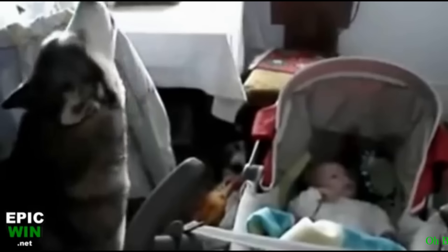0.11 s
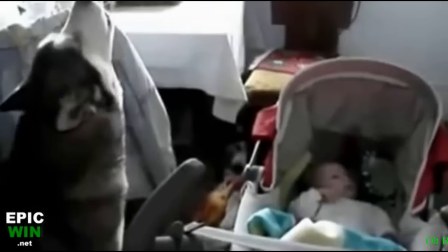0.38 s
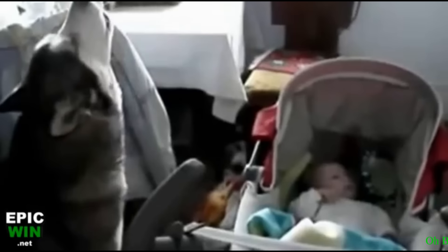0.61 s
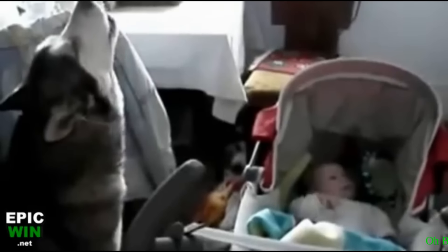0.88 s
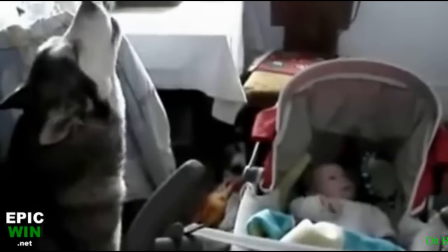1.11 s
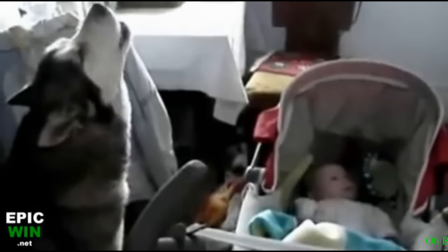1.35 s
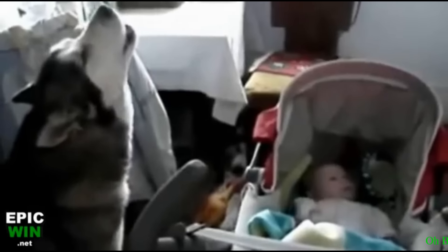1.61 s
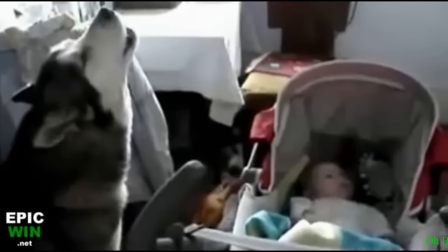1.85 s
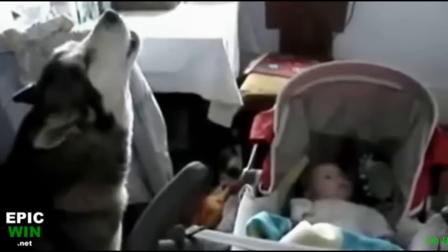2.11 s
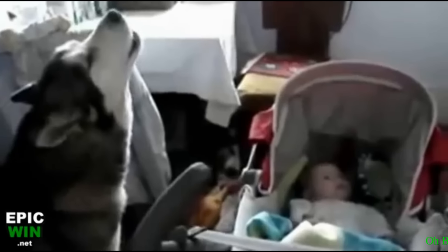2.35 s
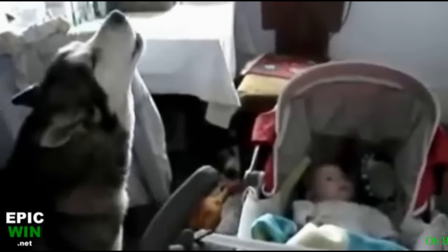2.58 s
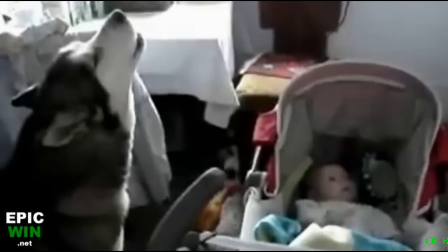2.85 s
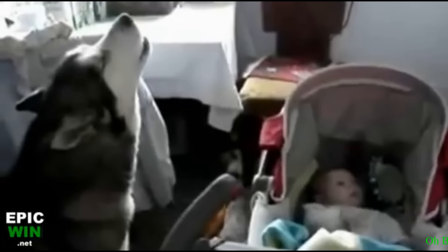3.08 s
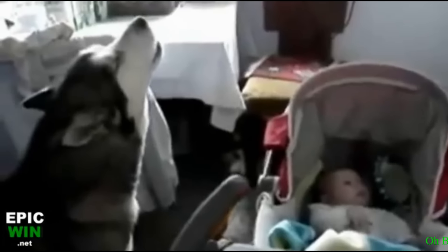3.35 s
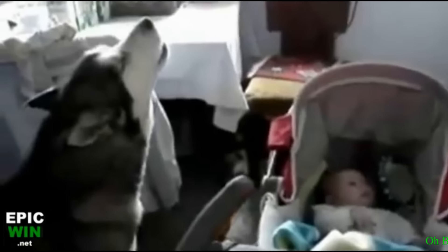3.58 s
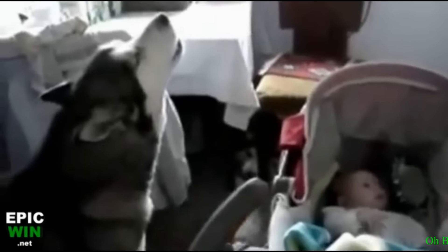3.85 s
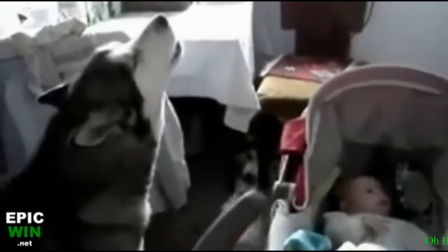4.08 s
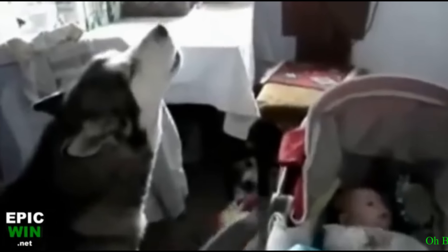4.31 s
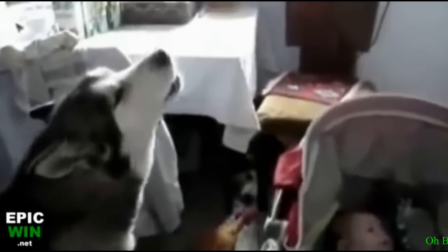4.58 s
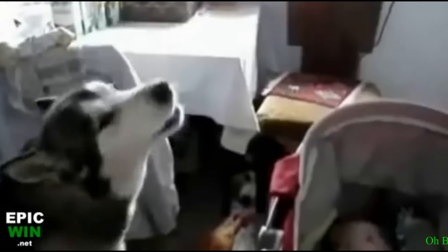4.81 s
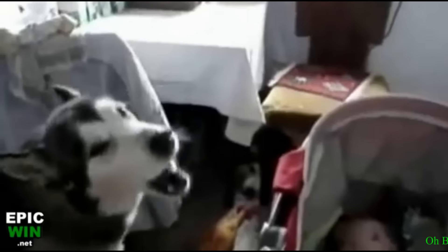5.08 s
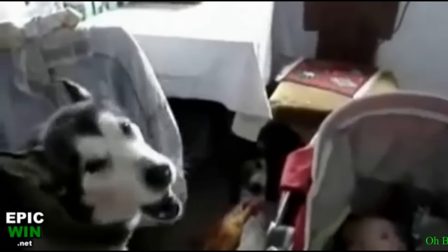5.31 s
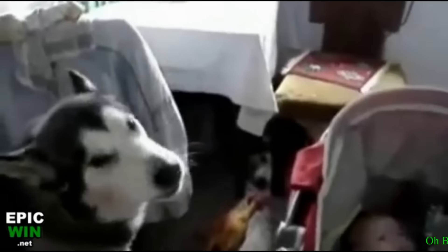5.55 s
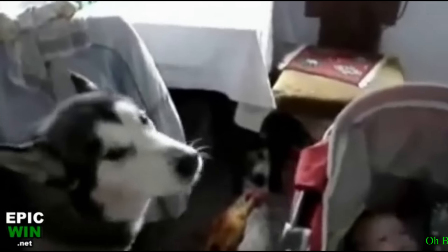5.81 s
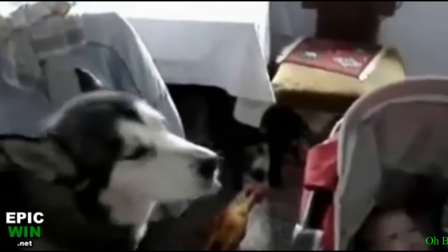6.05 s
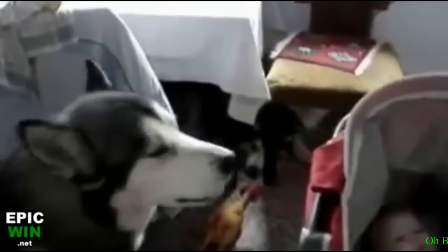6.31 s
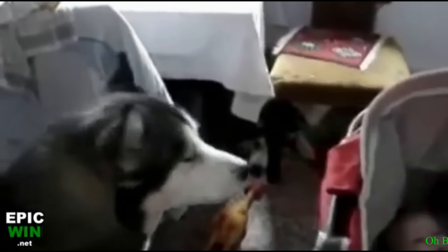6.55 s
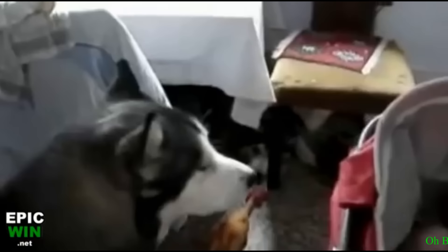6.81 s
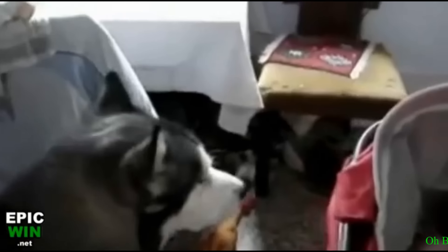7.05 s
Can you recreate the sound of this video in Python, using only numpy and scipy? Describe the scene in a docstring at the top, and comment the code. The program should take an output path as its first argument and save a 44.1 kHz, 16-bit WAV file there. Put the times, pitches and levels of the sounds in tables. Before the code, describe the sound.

Close in a small furnished room, a big dog is already howling: a loud, smooth note climbs in steps, holds, slides lower with brief hoarse breaks, and wavers on until about five seconds. A short room echo trails off. Then much quieter open-mouthed puffs, a small wet lip smack, a dull bump and a last soft breath. Faint mains buzz and hiss lie underneath; the sound is nearly mono and slightly dull on top.

```python
"""One long howl steps up, slides down and dies away; then puffs, gliding breath, lip smacks and dull bumps.
A large dog in a small furnished room: the voice is a stack of sine partials, notched by standing waves.
Puffs are noise through mouth resonances, some gliding as the jaws open; smacks and bumps are ringing modes.
Mains buzz and hiss run throughout; the sound is nearly mono and faint bands drop out under loud sound."""
import sys
import numpy as np
from scipy import signal
from scipy.fft import rfft, irfft, next_fast_len
from scipy.io import wavfile
from scipy.ndimage import uniform_filter1d

SR = 44100
rng = np.random.default_rng(int(sys.argv[2]) if len(sys.argv) > 2 else 0)


def volts_from_decibels(level):
    """Turn decibel levels (scalar or array-like) into linear amplitude factors."""
    exponent = np.asarray(level, float) / 20
    return 10 ** exponent


def int16_out(signal):
    """Quantize to a 16-bit WAV file."""
    q = np.round(np.clip(np.atleast_2d(signal).T, -1, 1) * 32767)
    wavfile.write(sys.argv[1], SR, q.astype(np.int16))


N = 316151

# Pitch of the note. Each row: time in seconds, pitch in Hz.
PITCH_HZ = [(0.0, 323.3), (0.054, 379.2), (0.15, 402), (0.27, 407.9), (0.46, 402.4), (0.5, 409.9),
            (0.66, 417.5), (0.69, 426.0), (0.71, 447.3), (0.76, 463.6), (1.2, 476.3), (1.28, 480.5),
            (1.36, 488.5), (1.43, 495.9), (1.56, 482.8), (1.83, 473.3), (1.9, 460.6), (2.08, 460.7),
            (2.105, 447.7), (2.13, 422.2), (2.24, 407), (2.31, 371), (2.41, 353.8), (2.47, 363.5),
            (2.62, 360.8), (2.75, 358.7), (2.93, 369.7), (3.2, 350), (3.5, 353.6), (3.66, 364.4),
            (3.73, 372.5), (3.84, 358), (3.97, 341.7), (4.08, 344.5), (4.33, 344.5), (4.43, 344.3),
            (4.52, 335.4), (4.72, 331.7), (4.79, 325), (4.9, 313.7), (5.0, 308)]
# Effort and mouth opening. Each row: time in seconds, 1st partial in dB, 2nd partial over the 1st in dB,
# brightness (base level of the high partials) in dB.
HOWL_DB = [(0.0, -12.5, -3.5, -56), (0.07, -4, -19.5, -59.5), (0.16, -12.0, 2, -54), (0.4, -15.5, 6, -55),
           (0.66, -10.5, 1.5, -53), (0.76, -6.5, -7.5, -57.5), (1.0, -10.5, -10, -52.5),
           (1.4, -8, -13, -52), (1.7, -8.5, -11, -51.5), (2.0, -15, 1.5, -53), (2.22, -13.5, 1.5, -57.5),
           (2.3, -6.5, -17.5, -54.5), (2.6, -9, -15.5, -60.5), (3.0, -7.5, -19, -61),
           (3.4, -11, -16.5, -67), (3.75, -7.5, -16, -58.5), (4.0, -8, -14, -66), (4.3, -11, -12.5, -63),
           (4.6, -8, -16.0, -63.5), (4.8, -10.5, -13.5, -61.5), (4.88, -21.5, -1, -86),
           (4.95, -29.5, -7.5, -81), (5.02, -61, 14, -87)]
# Moving resonances that lift partials 3 to 7. Each row: time in seconds, mouth in Hz, mouth level in dB,
# nose in Hz, nose level in dB.
FORMANTS = [(0, 1400, -48.5, 2200, -45.5), (.12, 1600, -38.5, 2310, -45), (.3, 1675, -42.5, 2345, -37.5),
            (.58, 1630, -44.5, 2300, -43), (.71, 1700, -35.5, 2200, -44.5), (.78, 1400, -45.5, 2320, -46),
            (1.1, 1420, -46, 2314, -44.5), (1.4, 1464, -40, 2790, -53), (1.6, 1420, -51, 2620, -45.5),
            (1.85, 1424, -40.5, 2350, -45), (2.1, 1500, -38, 2240, -34.5), (2.3, 1150, -42.5, 2196, -48),
            (2.7, 1080, -45.5, 2296, -51.5), (3.1, 1075, -53.5, 2164, -57), (3.35, 1080, -49, 2077, -65.5),
            (3.7, 1100, -50.5, 2136, -54), (4.1, 1036, -48.5, 2356, -74.5), (4.4, 1045, -48.5, 2344, -69.5),
            (4.6, 1002, -40.5, 2330, -55.5), (4.85, 970, -44.5, 2250, -55), (5, 937, -65, 2200, -88)]
# Throat and mouth resonances of partials 8 to 25. Each row: centre in Hz, width in Hz,
# level over the brightness in dB.
THROAT = [(2720, 480, -7), (3540, 750, -15), (4736, 580, -9), (5502, 120, -7.5), (6327, 470, -11.5),
          (7500, 2300, -19)]
# Standing-wave notches, one list for the 1st partial, one for the 2nd. Each row: time in seconds,
# depth in dB, spread of the bell (standard deviation) in seconds.
DIPS = [
    [(0.021, 5, 0.0057), (0.09, 6, 0.021), (0.14, 8.5, 0.0046), (0.245, 25.5, 0.013), (0.532, 15.5, 0.03),
     (0.614, 8.5, 0.031), (0.738, 19.5, 0.036), (0.747, 0.5, 0.005), (0.835, 8, 0.013), (0.918, 7, 0.023),
     (1.07, 0.5, 0.043), (1.37, 6, 0.02), (1.514, 3.0, 0.024), (1.911, 7.5, 0.03), (1.996, 11, 0.0069),
     (2.065, 1.5, 0.02), (2.137, 6.5, 0.007), (2.171, 10, 0.0062), (2.248, 16, 0.019), (2.291, 13, 0.0062),
     (2.35, 4, 0.012), (2.399, 17, 0.025), (2.455, 24.5, 0.016), (2.635, 3.5, 0.016), (2.758, 20, 0.034),
     (2.9, 2.5, 0.019), (3.03, 3, 0.031), (3.107, 20.5, 0.024), (3.26, 4.5, 0.023), (3.412, 4.5, 0.029),
     (3.597, 8.5, 0.028), (3.838, 16.5, 0.034), (3.949, 15.5, 0.012), (3.99, 8, 0.027), (4.102, 8, 0.025),
     (4.327, 8.5, 0.041), (4.492, 8.5, 0.017), (4.711, 13.5, 0.073), (4.916, 6.0, 0.01)],
    [(0.044, 8, 0.005), (0.085, 4.5, 0.007), (0.125, 14.5, 0.013), (0.22, 2, 0.024), (0.38, 0.5, 0.02),
     (0.586, 5, 0.031), (0.737, 12, 0.06), (0.963, 24, 0.011), (1.069, 9.5, 0.02), (1.29, 11.0, 0.038),
     (1.342, 10, 0.006), (1.422, 5, 0.013), (1.536, 9.0, 0.011), (1.632, 11.5, 0.097), (1.872, 2.5, 0.012),
     (1.93, 5, 0.016), (2.032, 10.5, 0.013), (2.1, 6.5, 0.0078), (2.16, 1.5, 0.019), (2.248, 14.5, 0.0085),
     (2.295, 8, 0.009), (2.384, 12.5, 0.017), (2.54, 6, 0.032), (2.672, 21.5, 0.032), (2.82, 6.5, 0.0058),
     (2.912, 6.5, 0.028), (3.082, 25.5, 0.026), (3.194, 9, 0.015), (3.368, 19.5, 0.012), (3.539, 17, 0.031),
     (3.64, 15.5, 0.01), (3.74, 20.5, 0.022), (3.813, 25.5, 0.019), (3.857, 20, 0.007),
     (3.905, 9.5, 0.0056), (3.95, 4, 0.012), (4.02, 3.5, 0.021), (4.27, 2.5, 0.03), (4.546, 3.5, 0.036),
     (4.843, 30.5, 0.064), (4.9, 31, 0.011)],
]
# Moments of extra hoarseness. Each row: start in seconds, length in seconds,
# added hoarseness 0 to 1 (0 adds none).
HOARSE_MOMENTS = [(-.05, .1, .45), (.11, .06, .25), (0.672, .11, .35), (2.088, .07, .35), (2.199, .16, 0.3),
                  (3.797, 0.11, 0), (4.28, .08, 0), (4.39, .07, 0.1), (4.501, .05, 0), (4.739, 0.12, 0.1)]
# Noise bursts: a very short one at the start, then stronger breath noise. Each row: start in seconds,
# length in seconds, extra level in dB.
NOISE_BURSTS = [(-.05, 0.034, 66), (.68, .28, 5), (1.739, .5, 8)]
# Buzz lines. Each row: frequency in Hz, level in dB.
HUM = [(30, -69.5), (60, -65), (200, -63.5), (300, -63), (900, -71.5), (950, -77.5), (1000, -66.5),
       (1050, -68.5), (1100, -71), (1150, -78.5), (1200, -77.5), (1250, -74.5), (1300, -68.5), (1500, -73),
       (1600, -80.5), (1650, -74.5), (1700, -73), (1800, -73.5), (2000, -75.5)]
# Hiss colour. Each row: frequency in Hz, relative density in dB.
HISS_COLOUR = [(12, -34), (20, 9), (49, -4), (115, -3.5), (193, -6), (301, -2), (659, -5), (1080, -11),
               (1400, -10.5), (1520, -8), (2430, -15), (7460, -18.5), (10200, -23), (13300, -55),
               (22000, -120)]
# Loop delays of the room in seconds, in a single row.
ECHO_S = [
    [.0131, .0173, .0199, .0237, .0281, .0323, .0371, .0419],
]
# Breath puffs. Each row: start in seconds, length in seconds, level in dB, strongest frequency in Hz,
# loss away from it in dB per octave.
PUFFS = [(5.09, 0.23, -47, 810, 8), (5.413, 0.16, -58, 1114, 4.5), (5.535, 0.049, -49, 4500, 9),
         (5.566, 0.31, -52.5, 1240, 5.5), (6.237, .43, -56, 3000, 6), (6.74, .16, -55.5, 1330, 4.5),
         (7.024, .2, -60.5, 1810, 4.5)]
# Panting-mouth resonances in four groups, low to high. Each row: centre in Hz, width of one pass in Hz,
# relative level in dB.
MOUTH = [
    [(477, 230, 1), (636, 87, 1.5)],
    [(841, 100, 17), (1020, 140, 9.5), (1248, 130, 16), (1438, 130, 14)],
    [(2150, 990, -2), (2420, 2000, 6), (2810, 130, 11)],
    [(4830, 2100, 18), (7900, 4000, 9)],
]
# Mouth resonances of the breath, gliding as the jaws open. Each row: start in seconds,
# length in seconds, first centre in Hz, last centre in Hz, level in dB.
GLIDES = [(5.111, .2, 625, 728, -49.5), (5.106, 0.17, 1250, 1592, -66), (5.125, .18, 1952, 2080, -54),
          (5.43, .07, 850, 867, -54), (5.536, .1, 852, 884, -52), (5.584, 0.23, 1003, 1310, -58),
          (5.602, 0.13, 1930, 1890, -58), (5.873, 0.68, 1086, 1128, -62), (6.0, 0.079, 402, 440, -54),
          (6.238, 0.33, 2380, 2610, -62)]
# Dull bumps. Each row: start in seconds, level in dB, base mode in Hz.
BUMPS = [(5.429, -48, 863), (5.991, -42, 333)]
# Wet lip smacks. Each row: start in seconds, level in dB, base mode in Hz.
SMACKS = [(5.5393, -43.5, 3700), (5.7773, -53, 3500)]
# Drop threshold of faint bands. Each row: frequency in Hz, dB below the power of the moment.
DROP_BELOW_DB = [(900, 78.5), (1300, 49), (2500, 61), (3300, 55), (5000, 57), (7000, 53), (10000, 63)]
# Right-channel tint. Each row: centre in Hz, width in Hz, gain in dB.
RIGHT = [(1900, 660, 2.02), (120, 60, 0.27), (4500, 2800, 0.66), (10500, 2000, -.7)]

STEADY_HOARSE, HOARSE_EDGE_S, HOARSE_DULL_DB = 0.07, 0.04, 17.5   # dulling: partials 3 to 7, full hoarseness
AIR_DB = -3   # over the brightness
MOUTH_WIDTH_HZ, NOSE_WIDTH_HZ = 330, 350
VALLEY_DB = -11   # floor of partials 3 to 7, over the brightness
MIDDLE_FADE_DB, SECOND_FADE_DB = 4, 1.17   # spread of random fading: partials 3 to 7, partial 2
HISS_DB = -52.5
ROOM_T60_S, ROOM_DB, WALL_CUT_HZ = 0.93, -27, 27000
SLOW_MODE_HZ, SLOW_MODE_WIDTH_HZ, SLOW_MODE_DB = 326, 1.2, -15
PUFF_RISE_S, PUFF_FALL_S = 0.036, 0.097
GLIDE_WIDTH_SHARE = 0.035   # noise low-pass rate as a share of the last centre
TOP_CUT_HZ = 10400


def rms_one(x):
    """Scale to rms 1."""
    return x / np.sqrt(np.mean(x ** 2) + 1e-20)


def in_time(rows):
    """Table columns as curves, one value a sample, corners rounded over 8 ms."""
    s, *columns = np.transpose(rows)
    t = np.arange(N) / SR
    return [uniform_filter1d(np.interp(t, s, column), size=SR // 120) for column in columns]


def wobble(rate_hz):
    """Smoothed random wobble, slow or fast by its rate: noise through a double one-pole low-pass, rms 1."""
    r = np.exp(-2 * np.pi * rate_hz / SR)
    noise = rng.standard_normal(N + SR)
    return rms_one(signal.lfilter([1], [1, -2 * r, r * r], noise)[SR:])


def span(start_s, length_s, rise_s, fall_s):
    """Gain 0 to 1 to 0 on straight ramps centred on the start and on the end."""
    t = np.arange(N) / SR
    rise = (t - start_s) / rise_s
    fall = (start_s + length_s - t) / fall_s
    return np.clip(np.minimum(rise, fall) + 0.5, 0, 1)


def fade_out(start_s, fade_s):
    """Gain 1 that falls to 0 from start_s on."""
    return np.clip((start_s + fade_s - np.arange(N) / SR) / fade_s, 0, 1)


def resonate(x, hz, width_hz):
    """One two-pole resonance, gain 1 on top."""
    r = np.exp(-np.pi * width_hz / SR)
    zeros = np.array([1, 0, -1]) * (1 - r * r) / 2
    poles = [1, -2 * r * np.cos(2 * np.pi * hz / SR), r * r]
    return signal.lfilter(zeros, poles, x)


def resonances(x, modes):
    """Parallel resonances, each applied twice for dark valleys."""
    return sum(volts_from_decibels(db) * resonate(resonate(x, hz, width_hz), hz, width_hz) for hz, width_hz, db in modes)


def peak(hz, centre_hz, width_hz):
    """Resonance curve, 1 at the centre."""
    return 1 / (1 + (2 * (hz - centre_hz) / width_hz) ** 2)


def standing_wave_dips(rows):
    """Standing waves cancel a partial: gain 1 with a bell-shaped notch per row."""
    t = np.arange(0, N, 32) / SR   # coarse steps
    notches = [1 - (1 - volts_from_decibels(-db)) * np.exp(-0.5 * ((t - s) / spread_s) ** 2) for s, db, spread_s in rows]
    return np.interp(np.arange(N) / SR, t, np.prod(notches, axis=0))


def howl():
    """Vocal folds beat steadily; hoarseness shakes size and pitch, and noise joins in."""
    hz, = in_time(PITCH_HZ)
    first_db, second_db, high_db = in_time(HOWL_DB)
    mouth_hz, mouth_db, nose_hz, nose_db = in_time(FORMANTS)
    extra = sum(h * span(s, length_s, HOARSE_EDGE_S, HOARSE_EDGE_S) for s, length_s, h in HOARSE_MOMENTS)
    hoarse = np.clip(STEADY_HOARSE + extra, 0, 1)
    jitter = 0.002 * wobble(14) + 0.025 * hoarse * wobble(90)
    phase = 2 * np.pi * np.cumsum(hz * (1 + jitter)) / SR

    first = volts_from_decibels(first_db) * standing_wave_dips(DIPS[0])
    second = volts_from_decibels(first_db + second_db + SECOND_FADE_DB * wobble(36)) * standing_wave_dips(DIPS[1])
    gains = [first, second]
    for k in range(3, 8):
        mouth = volts_from_decibels(mouth_db) * peak(k * hz, mouth_hz, MOUTH_WIDTH_HZ)
        nose = volts_from_decibels(nose_db) * peak(k * hz, nose_hz, NOSE_WIDTH_HZ)
        fading = volts_from_decibels(MIDDLE_FADE_DB * wobble(14) - HOARSE_DULL_DB * hoarse)
        gains.append((mouth + nose + volts_from_decibels(high_db + VALLEY_DB)) * fading)

    voice = 0
    for k, gain in enumerate(gains, 1):
        flutter = volts_from_decibels(0.6 * max(k - 2, 0) * wobble(60))   # room waves shake the higher partials more
        shimmer = 1 + (0.021 + 0.076 * k * hoarse) * wobble(180)
        voice = voice + gain * flutter * shimmer * np.sin(k * phase)
    for k in range(8, 26):
        lift = sum(volts_from_decibels(db) * peak(k * hz, top_hz, width_hz) for top_hz, width_hz, db in THROAT)
        voice = voice + lift * volts_from_decibels(high_db + 5.7 * wobble(9.2)) * np.sin(k * phase)   # each fades on its own

    breath = rng.standard_normal(N) * (1 + 0.25 * np.cos(phase))   # swells once a cycle
    bursts_db = sum(db * span(s, length_s, 0.1, 0.068) for s, length_s, db in NOISE_BURSTS)
    air_modes = [(3670, 1400, -15.0), (4663, 150, 6.0), (5600, 1500, -5.5), (6070, 750, -3)]
    air = volts_from_decibels(high_db + AIR_DB + bursts_db) * rms_one(resonances(breath, air_modes))
    rasp_modes = [(1520, 300, 2.5), (2230, 270, 6.5), (3700, 1500, -9)]
    rasp = volts_from_decibels(-39) * hoarse * rms_one(resonances(breath, rasp_modes))
    return (np.sqrt(2) * voice + air + rasp) * fade_out(4.99, 0.04)


def mains_buzz():
    """Sine lines of mains buzz, each wavering a little in level."""
    t = np.arange(N) / SR
    return sum(np.sqrt(2) * volts_from_decibels(db + 0.5 * wobble(3)) * np.sin(2 * np.pi * (hz * t + rng.random()))
               for hz, db in HUM)


def hiss():
    """Steady noise coloured in the spectrum."""
    hz = np.maximum(np.arange(N // 2 + 1) * SR / N, 1)
    colour_hz, colour_db = np.transpose(HISS_COLOUR)
    colour = volts_from_decibels(np.interp(np.log(hz), np.log(colour_hz), colour_db))
    return volts_from_decibels(HISS_DB) * rms_one(irfft(rfft(rng.standard_normal(N)) * colour, N))


def room(x):
    """Parallel feedback delays of alternating sign, duller on every round."""
    size = next_fast_len(N + 2 * SR)
    hz = np.arange(size // 2 + 1) * SR / size
    dull = 1 / np.sqrt(1 + (hz / WALL_CUT_HZ) ** 2)
    response = 0
    for k, delay_s in enumerate(ECHO_S[0]):
        loop = dull * volts_from_decibels(-60 * delay_s / ROOM_T60_S) * np.exp(-2j * np.pi * hz * delay_s)
        response = response + (-1) ** k * loop / (1 - loop)
    return volts_from_decibels(ROOM_DB) * irfft(rfft(x, size) * response, size)[:N]


def slow_mode(x):
    """One standing wave outlasts the rest: a very narrow resonance."""
    return volts_from_decibels(SLOW_MODE_DB) * resonate(x, SLOW_MODE_HZ, SLOW_MODE_WIDTH_HZ)


def puffs():
    """Breath through open jaws: noise in mouth resonances, each coming and going."""
    out = 0
    for modes in MOUTH:
        group_hz = np.exp(np.mean(np.log(np.array(modes)[:, 0])))
        gain = 0
        for s, length_s, db, best_hz, loss_db in PUFFS:
            group_db = db - loss_db * abs(np.log2(group_hz / best_hz))
            gain = gain + volts_from_decibels(group_db) * span(s, length_s, PUFF_RISE_S, PUFF_FALL_S)
        rush = sum(volts_from_decibels(2.0 * wobble(17)) * resonances(rng.standard_normal(N), [mode]) for mode in modes)
        out = out + gain * rms_one(rush)
    return out


def gliding_breath():
    """Mouth resonances of the breath, gliding as the jaws open: narrow noise bands."""
    out, t = 0, np.arange(N) / SR
    for s, length_s, from_hz, to_hz, db in GLIDES:
        centre_hz = np.interp(t, [s, s + length_s], [from_hz, to_hz])
        phase = 2 * np.pi * np.cumsum(centre_hz) / SR
        rate_hz = GLIDE_WIDTH_SHARE * to_hz
        band = wobble(rate_hz) * np.sin(phase) + wobble(rate_hz) * np.cos(phase)
        out = out + volts_from_decibels(db) * span(s, length_s, PUFF_RISE_S, PUFF_FALL_S) * band
    return out


def knocks(events, t60_s, overtones):
    """A click sets a few short modes ringing; overtones are (frequency ratio, dB)."""
    out, t = np.zeros(N), np.arange(SR // 5) / SR
    for s, db, hz in events:
        ring = sum(volts_from_decibels(part_db) * np.sin(2 * np.pi * hz * ratio * t) for ratio, part_db in overtones)
        at = round(s * SR)
        out[at:at + len(t)] += volts_from_decibels(db - 60 * t / t60_s) * ring
    return out


def bumps():
    """Dull bumps: two low modes ring briefly."""
    return knocks(BUMPS, 0.071, [(1, 4.5), (1.35, -5)])


def lip_smacks():
    """Wet smacks of the lips: a dense cluster of short high modes."""
    return knocks(SMACKS, 0.045, [(1, 4), (1.1, -9), (1.2, -7), (1.3, -4), (1.38, -8), (1.58, -11),
                                  (1.8, -19), (2.1, -13)])


def scene():
    """Dog, its room and the background at one microphone, sent to two channels."""
    dog = howl() + puffs() + gliding_breath() + bumps() + lip_smacks()
    heard = dog + room(dog) + slow_mode(dog) + mains_buzz() + hiss()
    return np.array([heard, heard])


def drop_faint_bands(x):
    """Frame by frame, narrow bands far under the total power of the moment drop out."""
    hz, _, frames = signal.stft(x, SR, nperseg=2048)
    power = np.abs(frames) ** 2 + 1e-16
    band = np.arange(len(hz)) // 4   # four bins a band
    band_power = np.add.reduceat(power, np.arange(0, len(hz), 4))
    band_db = 10 * np.log10(band_power)[band]
    moment_db = 10 * np.log10(uniform_filter1d(power.sum(axis=0), size=3))
    drop_hz, drop_db = np.transpose(DROP_BELOW_DB)
    below_db = np.interp(np.log(hz + 1), np.log(drop_hz), drop_db)
    margin_db = band_db - moment_db + below_db[:, None]
    gain = np.clip(margin_db / 2 + 0.5, 0, 1)
    return signal.istft(frames * gain, SR, nperseg=2048)[1][:N]


def low_pass(x):
    """Removes everything above the highest recorded frequency."""
    return signal.sosfilt(signal.butter(12, 13930, fs=SR, output="sos"), x)


def record(dry):
    """Drop faint bands, tint the right channel, cut the top."""
    left = drop_faint_bands(dry[0])
    tint = sum((volts_from_decibels(db) - 1) * resonate(left, hz, width_hz) for hz, width_hz, db in RIGHT)
    right = left + tint
    top_cut = signal.cheby2(12, 19, TOP_CUT_HZ, fs=SR, output="sos")
    mix = signal.sosfilt(top_cut, [left, right])
    return low_pass(mix)


dry = scene()
out = record(dry)
int16_out(out)
```